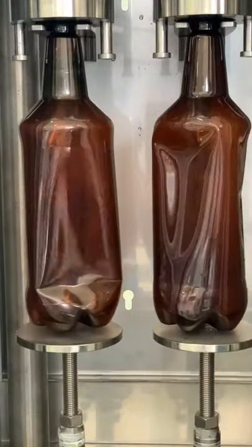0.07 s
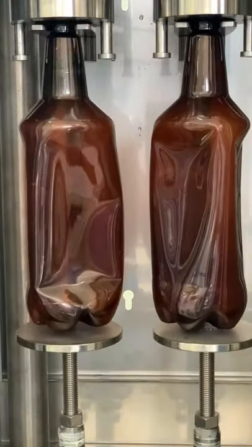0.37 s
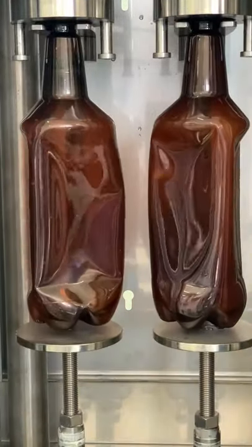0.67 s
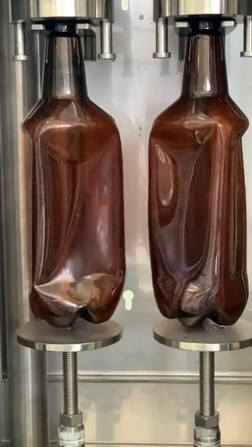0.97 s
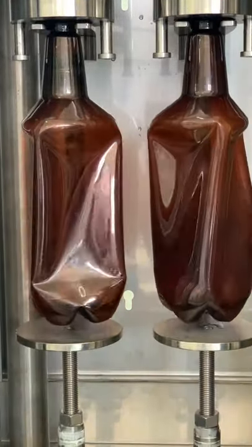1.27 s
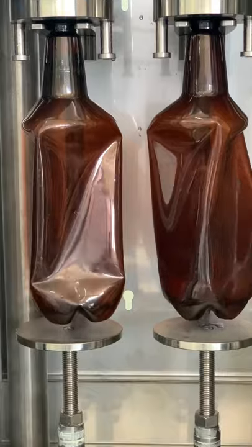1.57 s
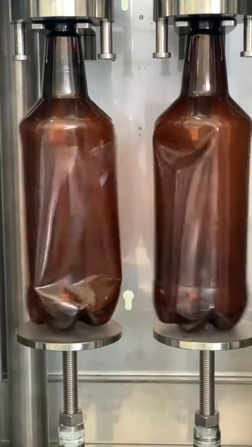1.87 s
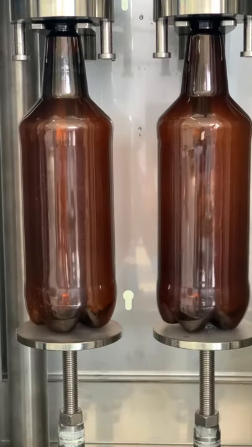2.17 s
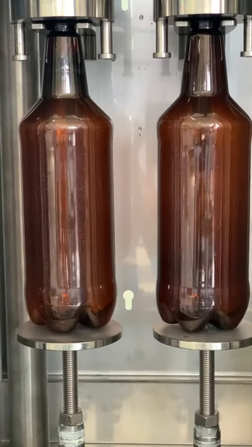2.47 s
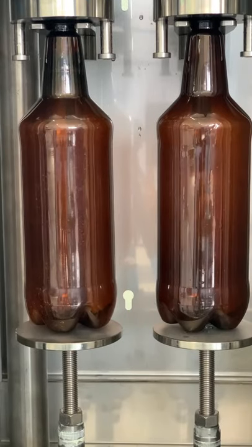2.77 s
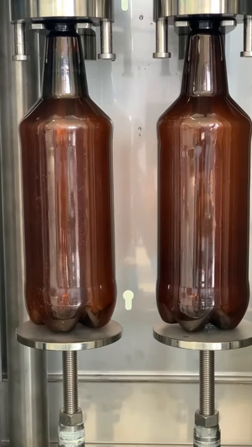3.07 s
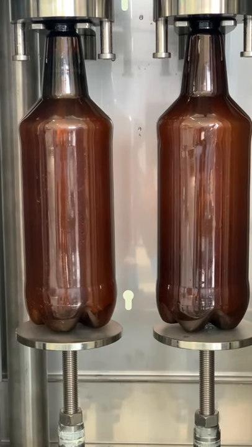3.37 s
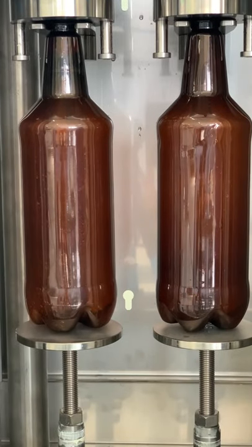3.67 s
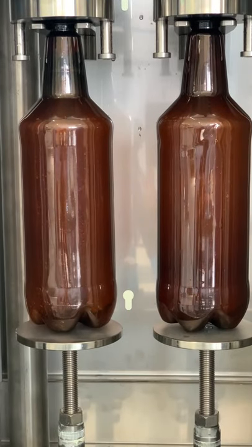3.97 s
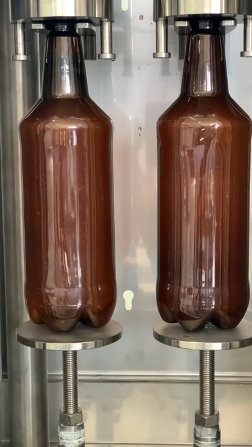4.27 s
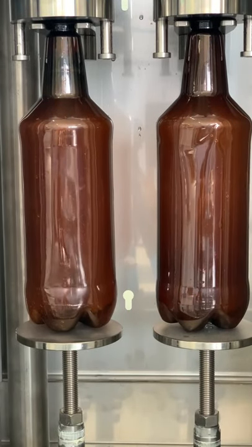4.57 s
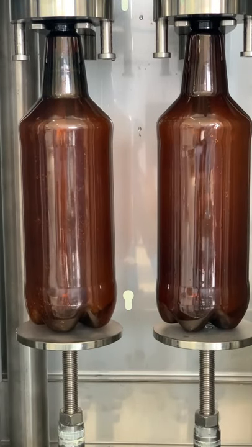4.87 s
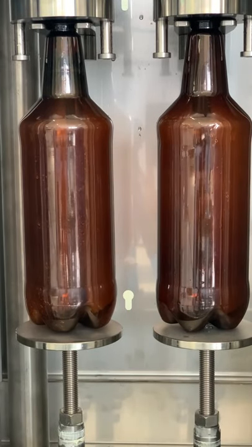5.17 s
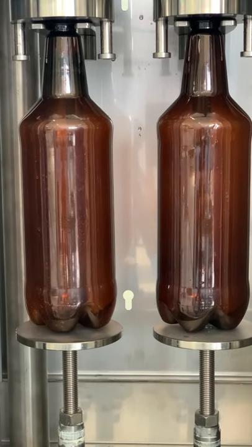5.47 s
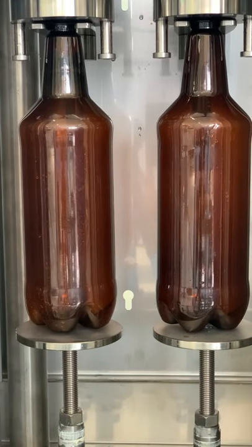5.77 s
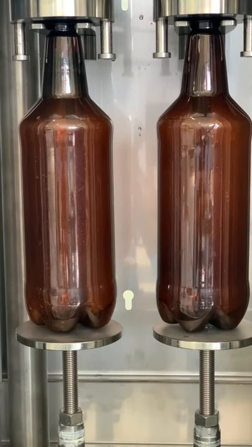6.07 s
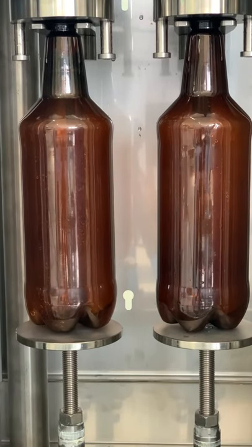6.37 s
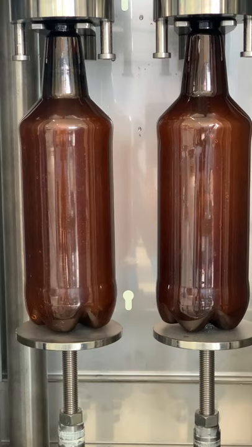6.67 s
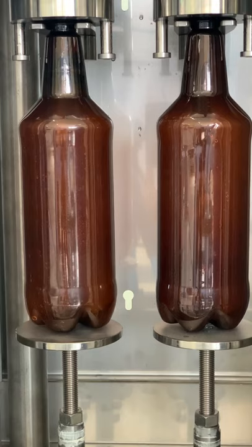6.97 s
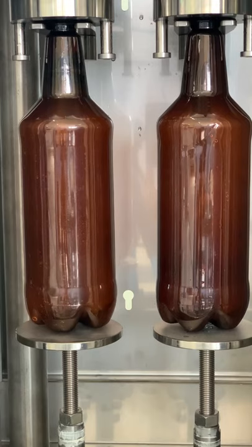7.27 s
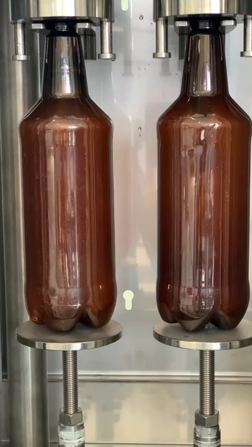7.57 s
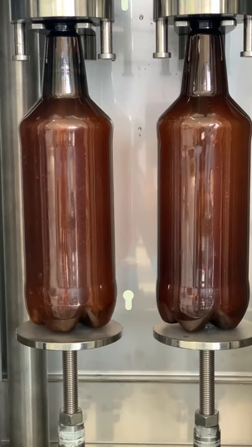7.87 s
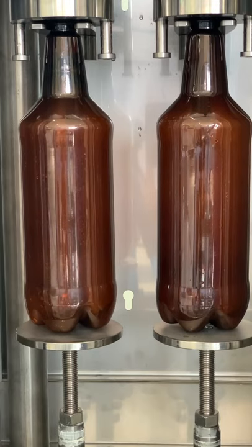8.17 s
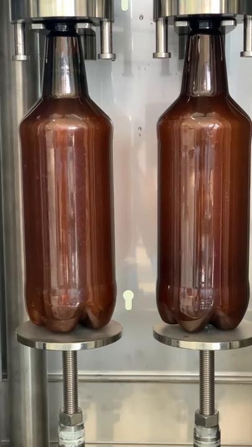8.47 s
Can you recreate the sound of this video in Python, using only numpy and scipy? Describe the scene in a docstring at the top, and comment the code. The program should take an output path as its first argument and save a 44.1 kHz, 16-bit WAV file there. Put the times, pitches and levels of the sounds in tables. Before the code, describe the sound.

A pump and motor hum quietly throughout, heard close inside a filling machine's steel cabinet. From the start, two plastic bottles buckle with scattered dull, hollow knocks over faint suction and leaking air. At about 1.7 seconds they snap back out in a loud, dense volley of pops and crackles, ending by 2 seconds. A hollow rush of gas follows. After a soft thump at 2.5 seconds, a thin, high, slightly whistling hiss sets in. Valves thump and click around 4.5 seconds and the hiss becomes fuller and louder. At 5.6 seconds more clicks and a tiny chirp narrow it again, while the hum swells with a faint whine. At about 7.7 seconds a valve bangs sharply and a loud, bright jet vents through a ringing pipe, fading from 8.1 seconds to the end.

```python
"""Two plastic bottles in a filler: vacuum buckles their walls, then gas snaps them back out in a volley
of pops. Pneumatic valves thump and switch between a throttled and a wide open hissing jet; at the end
a vent bangs open and blows through the ringing gas pipe. A pump and a motor hum behind it all.
Two closely spaced microphones listen in the steel cabinet."""
import sys
import numpy as np
from scipy import signal
from scipy.fft import rfft, irfft, next_fast_len
from scipy.io import wavfile
from scipy.ndimage import map_coordinates

SR = 44100
rng = np.random.default_rng(int(sys.argv[2]) if len(sys.argv) > 2 else 0)


def dump_mix(stems):
    """Bounce the given channels to the path in sys.argv[1] as a 16-bit WAV at rate SR."""
    frames = np.atleast_2d(stems).T  # one column per channel
    limited = np.clip(frames, -1, 1)  # hard clip at full scale
    pcm = np.round(limited * 32767).astype(np.int16)
    wavfile.write(sys.argv[1], SR, pcm)


N = 375732

# Bottle wall and valve block resonances. Each row: centre in Hz, width in Hz, gain in dB.
WALL_MODES = [(181.7, 16, 12), (306.5, 18, 6.5), (377, 16, 10), (460, 13, 5), (640, 23, 9.5), (735, 12, 10),
              (969, 12, 6), (1137, 18, 9), (1184, 14, 8), (1422, 7.1, -2.5), (1533, 16, 3), (1686, 17, 1.5),
              (2220, 20, 3), (2270, 20, 4), (2630, 14, 6)]
VALVE_MODES = [(546, 60, -23), (640, 200, 12), (1080, 61, 9.5), (1800, 410, 6), (2850, 81, 5)]
# Crumpling plastic. Each row: frequency in Hz, gain in dB.
CRUMPLE_SPECTRUM = [(30, -38), (70, 13), (130, -30), (600, -4.5), (1250, 3), (2400, -3), (3600, -6),
                    (7000, -19), (15000, -44)]
# Valve piston strokes. Each row: start in seconds, travel in seconds, level in dB.
PISTON_STROKES = [(2.499, 0.055, -27.5), (4.556, 0.022, -27), (5.599, 0.0497, -29), (7.657, 0.035, -24)]


def bottles():
    """Slack walls cave in with dull booms; taut ones snap back out with sharp cracks and ring."""
    # Each row: start in seconds, pitch in Hz, relative level in dB, ring in cycles, pitch slide.
    buckles = [(0, 248, -26, 7.8, 0.024), (.078, 827, -20.5, 8.4, -0.028), (0.082, 311.2, -19, 62, -.1),
               (.088, 1140, -30, 20, 0.21), (.135, 319, -20.5, 27, -0.039), (0.826, 304, -26.5, 11, 0.19),
               (0.842, 610, -19.5, 27, 0.11), (.973, 160, -34.5, 13, 0.14), (1.002, 143, -33, 8.8, 0.12),
               (1.092, 884, -34.5, 12, 0.21), (1.136, 1250, -50, 11, 0.065), (1.305, 804, -29.5, 7.6, 0.19),
               (1.44, 135, -15.5, 5.7, 0.44), (1.467, 96.5, -23, 5.9, 0.3), (1.499, 1006, -34, 20, 0.055),
               (1.608, 193.6, -15.5, 17, 0.29), (1.611, 640, -26, 23, -0.041), (1.649, 160, -26, 17, 0.15),
               (1.683, 496, -29, 20, 0.125)]
    # Each row: start in seconds, pitch in Hz, relative level in dB, crack offset in dB.
    snaps = [(1.722, 441, -14.5, -20), (1.731, 459, -11.5, -13), (1.746, 188, -12.5, -18),
             (1.749, 1170, -13, -15), (1.757, 279, -7.5, -11.5), (1.764, 586, -11.5, -17),
             (1.772, 1160, -28, -19), (1.79, 440, -16, -8), (1.797, 374, -8.5, -7), (1.843, 497, -17, -22),
             (1.849, 445, -12.5, 3.5), (1.88, 231, -17, -11), (1.896, 567, -14, 3), (1.95, 473, -17.5, -24),
             (1.977, 626, -13, -1.5), (1.983, 620, -12, -12)]
    crumple_db = lambda hz: 4.5 * np.log2(hz / 375)  # smaller, higher panels crumple more
    caving = [(s, hz, db, db + crumple_db(hz), db + crumple_db(hz)) for s, hz, db, _, _ in buckles]
    cycles, slides = np.transpose(buckles)[3:]
    dents = blows(caving, WALL_MODES, body_db=5, clack_db=-10, crack_db=-19, rise_s=0.0012,
                  cycles=cycles, slides=slides, clack_t60_s=0.19, crack_t60_s=0.042, dull_hz=3100,
                  fold_cycles=1)
    snapping = [(s, hz, db, db, db + sharp_db) for s, hz, db, sharp_db in snaps]
    pops = blows(snapping, WALL_MODES, body_db=-4.5, clack_db=1.5, crack_db=8, rise_s=0.0015,
                 cycles=42, slides=0.098, clack_t60_s=0.078, crack_t60_s=0.035, dull_hz=12200)
    return dents + pops + wall_ring(snaps, ring_db=-25, rise_s=0.002)


def blows(events, resonances, body_db, clack_db, crack_db, rise_s, cycles, slides,
          clack_t60_s, crack_t60_s, dull_hz, fold_cycles=0):
    """Each blow swings a panel, shakes its dense higher modes and cracks."""
    # Each row: frequency in Hz, gain in dB.
    crack_spectrum = [(1000, -45), (2800, 11.5), (5000, 7), (7200, 12), (9500, 7.5), (12500, -1),
                      (15500, 3)]
    near = [(200, 0.89), (1500, 0.98), (3500, 0.29), (7000, 1.0)]  # Hz, left-right coherence
    partials = [(0.65, -11.5), (1, -1), (1.37, -11.5), (1.85, -17)]  # pitch ratio, dB
    out, t = np.zeros((2, N)), np.arange(SR // 4) / SR
    dense = lambda f: np.hypot(colour(CRUMPLE_SPECTRUM)(f), modes(resonances)(f))
    dulled = lambda f: dense(f) / np.hypot(1, (f / dull_hz) ** 2)
    each = np.ones(len(events))
    for (s, hz, body, clack, crack), ring_cycles, slide in zip(events, cycles * each, slides * each):
        warped_s = t + slide * 0.025 * (1 - np.exp(-t / 0.031))  # pitch settles as the stress lets go
        panel = sum(amp(db) * np.sin(2 * np.pi * hz * ratio * warped_s * rng.normal(1, 0.0072))
                    for ratio, db in partials)
        panel_t60_s = ring_cycles / hz + 0.056
        sound = amp(body + body_db - 60 * t / panel_t60_s) * panel
        # Modes far below the panel's pitch hardly shake.
        shaken = lambda f: dulled(f) * f ** 2 / np.hypot(f ** 2, (0.24 * hz) ** 2)
        sound = sound + amp(clack + clack_db - 60 * t / clack_t60_s) * rush(shaken, near, len(t))
        sound += amp(crack + crack_db - 60 * t / crack_t60_s) * rush(colour(crack_spectrum), near, len(t))
        swell = 1 - np.exp(-(t / (rise_s + fold_cycles / hz)) ** 2)  # large panels fold more slowly
        add(out, s, swell * sound)
    return signal.sosfilt(signal.butter(3, 90, "high", fs=SR, output="sos"), out)


def wall_ring(snaps, ring_db, rise_s):
    """Every snap leaves the hollow walls ringing, each mode a little differently."""
    out, t = np.zeros((2, N)), np.arange(SR // 2) / SR
    for s, _, db, _ in snaps:
        ring = np.zeros(len(t))
        for hz, width_hz, mode_db in WALL_MODES:
            decay = amp(mode_db + 2 * rng.standard_normal()) * np.exp(-np.pi * width_hz * t)
            ring += decay * np.sin(2 * np.pi * hz * t + rng.uniform(0, 2 * np.pi))
        add(out, s, amp(db + ring_db) * (1 - np.exp(-t / rise_s)) * ring)
    return out


def crunch():
    """Small creases flatten in a dense, uneven rattle as the bottles fill out."""
    creases = unit(amp(5.9 * wobble(350)) * rush(colour(CRUMPLE_SPECTRUM)))
    return flow(1.722, 1.722, db=-22.6, rise_s=0.0098, fall_s=0.15) * creases


def vacuum():
    """Air is drawn through the resonant necks while the seals leak; gas surges in just before the pops."""
    # Each row: time in seconds, relative neck level in dB, relative rumble level in dB.
    suction = [(0.0, -41.5, -36), (0.358, -36.5, -42), (0.602, -38, -50.5), (0.886, -38, -40),
               (1.092, -38.5, -50.5), (1.402, -41, -51.5), (1.618, -46, -39), (1.72, -25, -32)]
    # Each row: centre in Hz, width in Hz, gain in dB.
    neck_modes = [(990, 38, 7.5), (1168, 117, 5), (1510, 160, 7), (1741, 22, 9.5), (2430, 40, 0),
                  (2744, 52, 0.5)]
    # Each row: start in seconds, end in seconds, level in dB.
    seal_leaks = [(0, 0.778, -36), (1.413, 1.47, -38), (1.568, 1.73, -38.5)]
    # Each row: frequency in Hz, gain in dB.
    leak_spectrum = [(500, -45), (2000, 0), (3300, -2), (5200, -2), (6200, -3), (8500, -1.5), (10500, -2),
                     (13000, 1), (14500, -2), (15600, -5)]
    neck_tilt = colour([(600, 9), (900, 5), (2850, 6), (3200, -12)])
    low = colour([(25, 9), (60, 5), (120, 9), (200, 8), (420, 5), (800, 2), (2000, -44), (5000, -53)])
    flutter = amp(1.1 * wobble(40))
    surge = flow(1.54, 1.91, db=-32, rise_s=0.014, fall_s=0.057)
    neck_gain = flutter * np.hypot(amp(1) * level(suction, column=1, fade_s=0.03), surge)
    necks = neck_gain * rush(lambda hz: modes(neck_modes)(hz) * neck_tilt(hz))
    rumble = amp(1.5) * level(suction, column=2, fade_s=0.0066) * rush(low)
    leaks = sum(flow(*row, rise_s=0.0043, fall_s=0.1, sag_db_per_s=4.5) for row in seal_leaks)
    seepage = flow(0, suction[-1][0], db=-50, rise_s=0.012, fall_s=0.05)
    return necks + rumble + np.hypot(leaks, seepage) * rush(colour(leak_spectrum))


def purge():
    """Gas floods the empty bottles; their hollow rush dies as the pressure evens out."""
    # Each row: frequency in Hz, gain in dB.
    hiss_spectrum = [(200, -48), (900, -38), (1500, -16), (2800, -9), (4200, -9), (6000, -11), (8500, -4.5),
                     (10500, -8), (11600, -9), (13200, -1.5), (14300, -3), (15600, -40)]
    hollow_spectrum = [(30, -3.5), (60, -10), (250, -10), (370, -3.5), (470, -6), (610, -6), (780, -6),
                       (1150, -10.5), (1600, -12.5), (2800, -16.5), (5000, -22.5), (9000, -38)]
    # Air in the bottles. Each row: centre in Hz, width in Hz, gain in dB.
    air_modes = [(372, 26, -6), (538, 25, -3.5), (628, 27, 2), (870, 40, -15), (1163, 75, -10.5),
                 (1490, 52, -14), (1780, 60, -13.5), (2450, 47, -26), (2800, 110, -26)]
    start_s, hiss_s, hollow_s = 2.014, 0.521, 0.22
    hiss = flow(start_s, start_s + hiss_s, db=-33.5, rise_s=0.12, fall_s=0.028)
    hiss = hiss * rush(colour(hiss_spectrum))
    air = amp(-2) * rush(colour(hollow_spectrum)) + amp(-3) * rush(modes(air_modes))
    hollow = flow(start_s, start_s + hollow_s, db=-27.5, rise_s=0.12, fall_s=0.4) * air
    return amp(1.1 * wobble(31.25)) * hiss + amp(0.76 * wobble(11)) * hollow


def knocks():
    """A valve hits its seat, rings the block and spits."""
    # Each row: start in seconds, pitch in Hz, relative levels of body, clack and spit in dB.
    seat_hits = [(4.539, 480, -34, -45, -52), (4.567, 724, -33, -39, -57), (4.599, 403, -25.5, -37, -59),
                 (4.638, 1230, -36, -37.5, -55), (4.679, 1910, -44, -38, -58), (5.584, 900, -42, -40, -46),
                 (5.612, 650, -43, -47, -55), (5.642, 2030, -24, -39, -49), (5.75, 674, -26, -35, -60),
                 (7.713, 680, -12.5, -29.5, -39), (7.739, 650, -13, -21, -14.5),
                 (7.744, 503, -19, -14, -31), (7.759, 1160, -14, -28, -45)]
    return blows(seat_hits, VALVE_MODES, body_db=-5.5, clack_db=-1, crack_db=5.5, rise_s=0.0008,
                 cycles=2.8, slides=0, clack_t60_s=0.08, crack_t60_s=0.071, dull_hz=6000)


def pistons():
    """A piston gives one low swing of air pressure as it starts and another as it stops."""
    swing_hz, width_s, centre_s = 92, 0.0098, 0.05
    out, t = np.zeros((2, N)), np.arange(SR // 10) / SR - centre_s
    swing = -np.cos(2 * np.pi * swing_hz * t) * np.exp(-(t / width_s) ** 2)
    for start_s, travel_s, db in PISTON_STROKES:
        for s in (start_s, start_s + travel_s):
            add(out, s - centre_s, amp(db) * swing)
    return out


def spills():
    """A moving piston lets a rough puff of air through."""
    # Each row: frequency in Hz, gain in dB.
    puff_spectrum = [(30, -34), (70, 12.5), (185, 1.5), (250, -5), (350, 1.5), (650, -22), (1300, -8),
                     (2200, -10.5), (4000, -13), (8000, -13), (15000, -60)]
    lead_s, lag_s = 0.023, 0.0029
    gain = sum(flow(s - lead_s, s + travel_s + lag_s, db - 9.5, rise_s=0.0025, fall_s=0.067)
               for s, travel_s, db in PISTON_STROKES)
    return gain * amp(0.66 * wobble(160)) * rush(colour(puff_spectrum))


def jets():
    """The valves switch between a throttled and a wide open jet; the flow sounds the pipe."""
    # Each row: start and end in seconds, level in dB, sag in dB/s, relative upper resonance level in dB.
    throttled_spans = [(2.602, 4.512, -37.5, 4, -41), (5.686, 7.622, -37, 0.5, -32)]
    # Each row: start in seconds, end in seconds, level in dB.
    open_spans = [(4.498, 4.59, -38), (4.634, 5.643, -33), (7.6, 7.716, -33.5)]
    # Each row: frequency in Hz, gain in dB.
    throttled_spectrum = [(2500, -45), (4400, -26), (6000, -20), (7100, -11), (7520, -5), (7720, 6.5),
                          (7900, 4), (8120, -1), (8480, 6.5), (8850, -3), (9150, -1), (9700, -12),
                          (10500, -1.5), (11500, -9), (12900, -12), (14100, -3.5), (15300, -24)]
    open_spectrum = [(2500, -45), (4400, -32), (5400, -16), (6600, -6), (8200, 1.5), (8700, -2), (9150, 1),
                     (9600, -2), (10250, 1.5), (11400, -6), (13000, -1), (14200, 0), (15000, -10),
                     (15600, -21)]
    pipe_tilt = colour([(1500, 8), (2400, 2), (2800, 3), (3300, 2), (3750, -3.5), (4300, -7.5),
                        (4900, -9.5), (7000, -11)])
    throttled = sum(flow(start_s, end_s, db, rise_s=0.013, fall_s=0.008, sag_db_per_s=sag)
                    for start_s, end_s, db, sag, _ in throttled_spans)
    upper = sum(flow(start_s, end_s, db, rise_s=0.08, fall_s=0.012, sag_db_per_s=8.5)
                for start_s, end_s, _, _, db in throttled_spans)
    wide = sum(flow(*row, rise_s=0.018, fall_s=0.0099, sag_db_per_s=4.5) for row in open_spans)
    out = wide * rush(colour(open_spectrum)) + throttled * rush(colour(throttled_spectrum))
    out += upper * amp(1.2 * wobble(30) - 1.5) * glide(rush(modes([(10700, 340, 0)])), waver=0.004)
    sustained = sum(flow(*row, rise_s=0.019, fall_s=0.019) for row in open_spans)
    drive = amp(-19) * throttled + amp(-17.5) * upper + amp(-18) * sustained
    out += drive * pipe(pipe_tilt, waver=0.00198, flutter_db=2)
    out += head_whistle()
    # One line never quite closes.
    seep = amp(-51.5) * rush(modes([(8180, 520, -0.24), (10900, 390, -0.75)]))
    seep += amp(-56.5) * rush(colour(open_spectrum))
    return seep + out * amp(0.2 * wobble(18))


def vent():
    """Pressure escapes in a bright jet that rings pipe and nozzle; its first gust roars in the block."""
    # Each row: frequency in Hz, gain in dB.
    jet_spectrum = [(60, -16), (200, -19), (1100, -13), (2100, -21), (3500, -27), (4400, -23), (5100, -15),
                    (5800, -19), (6900, -13), (7180, -28), (7450, -9), (7800, -1), (8050, -2), (8600, -11),
                    (9300, -6), (9650, -8), (10100, 0), (12700, 1), (14300, -1), (15600, -8)]
    # Each row: centre in Hz, width in Hz, gain in dB.
    nozzle_modes = [(7880, 130, -8), (10380, 110, -6), (10960, 80, -4), (11480, 75, 0), (11940, 55, -6),
                    (12590, 100, 1), (13340, 50, -7), (13780, 65, -2), (14330, 90, -3), (15460, 70, -5)]
    start_s, hold_s, gust_s = 7.719, 0.39, 0.019
    ringing = amp(-8.5) * pipe(np.ones_like, waver=0.00206, flutter_db=2.5)
    shrill = amp(-1) * rush(modes(nozzle_modes))
    blast = amp(-2) * rush(colour(jet_spectrum)) + ringing + glide(shrill, waver=0.00095)
    jet = flow(start_s, start_s + hold_s, db=-24, rise_s=0.0023, fall_s=0.62, sag_db_per_s=-1.5)
    gust = flow(start_s, start_s + gust_s, db=-32, rise_s=0.0046, fall_s=0.12)
    return jet * blast + gust * rush(modes(VALVE_MODES))


def pipe(tilt, waver, flutter_db):
    """Turbulent gas sounds the pipe; neighbouring resonances waver and flutter independently."""
    # Each row: centre in Hz, width in Hz, gain in dB.
    pipe_modes = [(1493, 20, -9.5), (1775, 27, -6), (2394, 44, -7), (2784, 42.5, 0.5), (3275, 33, -1.5),
                  (3734, 37, 0.5), (4174, 42, -1.5), (4680, 34, 0.5), (5000, 89, -20), (5514, 32, 2.5),
                  (5990, 37, 2), (6460, 61, 5.5), (6760, 140, 3.5)]
    out = np.zeros((2, N))
    for group in (pipe_modes[::2], pipe_modes[1::2]):
        response = lambda hz: modes(group)(hz) * tilt(hz)
        weight = np.linalg.norm(response(np.arange(SR // 2)))
        out += weight * glide(rush(response), waver) * amp(flutter_db * wobble(28))
    return unit(out)


def glide(x, waver):
    """Resonances follow the pipe's pitch: up in open flow, down when throttled, wavering by a share."""
    # Each row: time in seconds, main pipe resonance in Hz.
    pipe_pitch = [(2.6, 2850), (3.0, 2820), (3.5, 2750), (4.5, 2695), (5.1, 2810), (5.55, 2835),
                  (5.9, 2820), (6.5, 2755), (7.7, 2715), (7.95, 2775), (8.5, 2805)]
    nominal_hz = 2787
    speed = np.interp(np.arange(N) / SR, *np.transpose(pipe_pitch)) / nominal_hz
    position = np.cumsum(speed + waver * wobble(40))
    return np.array([map_coordinates(side, [position], order=5, mode="mirror") for side in x])


def chirps():
    """Gas squeezing past a valve seat whistles for a moment."""
    # Each row: start in seconds, length in seconds, pitch in Hz, level in dB.
    whistles = [(3.22, 0.15, 3020, -59), (3.472, 0.08, 2980, -57), (5.575, 0.039, 4430, -44),
                (5.617, 0.017, 2800, -47), (7.925, 0.07, 4670, -35)]
    return sum(flow(s, s + length_s, db, rise_s=0.0049, fall_s=0.012) * rush(modes([(hz, 22, 0)]))
               for s, length_s, hz, db in whistles)


def head_whistle():
    """A faint, narrow whistle at the filling heads."""
    return flow(3.08, 3.47, db=-57, rise_s=0.099, fall_s=0.77) * rush(modes([(1876, 5.6, 0)]))


def factory():
    """Hall noise, a humming motor and a pump that puffs once a turn; under load they swell and whine."""
    # Each row: multiple of the shaft rate, relative level in dB.
    pump_orders = [(6, -68), (8, -49.8), (9, -52.3), (11, -65), (12, -63.5), (14, -66.5), (15, -56),
                   (18, -66.5), (20, -68), (24, -74), (27, -74), (39, -69.5)]
    # Each row: frequency in Hz, gain in dB.
    throb_spectrum = [(200, -27), (380, 1), (750, -11), (1100, -7.5), (2000, -13), (5000, -50)]
    hall_spectrum = [(25, -28), (58, 4.5), (85, 0.5), (200, -2.5), (330, -1), (400, 2.5), (520, 0),
                     (750, -3.5), (1100, -4), (1500, -12.5), (1850, -7), (2150, -15.5), (3000, -14),
                     (8000, -45)]
    shaft_hz, whine_hz, whine_drop_hz = 47.78, 728, 50
    load_start_s, load_rise_s = 5.07, 1.5
    load = 1 - np.exp(-np.maximum(np.arange(N) / SR - load_start_s, 0) / load_rise_s)
    shaft_rad = 2 * np.pi * np.cumsum(shaft_hz + 0.0658 * wobble(11)) / SR
    pump = np.zeros(N)
    for order, db in pump_orders:
        peak = np.sqrt(2) * amp(db + 0.33 * wobble(7.9))
        pump += peak * np.sin(order * shaft_rad + rng.uniform(0, 2 * np.pi))
    motor = amp(-59.5) * tone(59.2, drift_hz=0.4, flutter_db=0.6)
    whine = tone(whine_hz + whine_drop_hz * (1 - load), drift_hz=7.9, flutter_db=3.5)
    whine = whine + amp(-3) * rush(modes([(whine_hz, 25, 0)]))
    throb = amp(-58.5) * unit((1 + np.cos(shaft_rad)) ** 3 * rush(colour(throb_spectrum)))
    hall = amp(-49.5) * rush(colour(hall_spectrum))
    return hall + amp(6.5 * load - 3.1) * (pump + throb + motor) + load * amp(-52.5) * whine


def cabinet(x):
    """The steel walls reverberate; the bass lasts longest."""
    # Each row: frequency in Hz, T60 in seconds.
    decay_times = [(100, 0.86), (500, 0.33), (2500, 0.14), (7000, 0.2), (15000, 0.21)]
    hz, t, noise = signal.stft(rng.standard_normal((2, SR // 2)), SR, nperseg=256)
    decay = amp(-60 * t / along(decay_times, hz)[:, None])
    mid, side = signal.istft(noise * decay, SR, nperseg=256)[1]
    side = filtered(side, colour([(100, -31), (400, -7), (1000, -9), (4000, -2), (7000, -23)]))
    tail = np.pad([mid + side, mid - side], ((0, 0), (SR // 200, 0)))  # 5 ms predelay
    return signal.fftconvolve(x, tail / np.linalg.norm(tail[0]), axes=1)[:, :N]


def flow(start_s, end_s, db, rise_s, fall_s, sag_db_per_s=0):
    """Gain per sample of a gas flow: it builds, sags with the pressure and dies away after its end."""
    t = np.arange(N) / SR
    age_s = np.maximum(t - start_s, 0)
    release = np.exp(-np.maximum(t - end_s, 0) / fall_s)
    return amp(db - sag_db_per_s * age_s) * (1 - np.exp(-age_s / rise_s)) * release


def rush(response, coherence=None, size=N):
    """Coloured stereo noise of rms 1."""
    # Each row: frequency in Hz, left-right coherence.
    default_coherence = [(100, .99), (350, .88), (700, .5), (1600, .6), (3000, .35), (4100, .35),
                         (4900, .95), (5800, .75), (6800, .95), (8400, .88), (9100, .99), (9700, .999),
                         (10200, .99), (11000, .87), (12400, .96), (14000, .92), (14700, .998)]
    angle = lambda hz: np.arccos(np.clip(along(coherence or default_coherence, hz), -1, 1)) / 2
    split = lambda hz: response(hz) * [np.cos(angle(hz)), np.sin(angle(hz))]
    mid, side = filtered(rng.standard_normal((2, size)), split)
    return unit(np.array([mid + side, mid - side]))


def tone(hz, drift_hz, flutter_db):
    """A slightly unsteady motor line of rms about 1."""
    phase = 2 * np.pi * np.cumsum(hz + drift_hz * wobble(6)) / SR
    return np.sqrt(2) * np.sin(phase) * amp(flutter_db * wobble(2.66))


def amp(db):
    return 10 ** (np.asarray(db) / 20)


def unit(x):
    return x / np.sqrt(np.mean(x ** 2) + 1e-20)


def along(points, hz):
    """Interpolate (Hz, value) points on a log axis."""
    point_hz, values = np.transpose(points)
    return np.interp(np.log(hz + 1), np.log(point_hz + 1), values)


def colour(points):
    """Frequency response of (Hz, dB) points."""
    return lambda hz: amp(along(points, hz))


def modes(table):
    """Frequency response of (centre Hz, width Hz, dB) resonances with steep skirts."""
    return lambda hz: np.sqrt(sum((amp(db) / (1 + ((hz - centre_hz) / width_hz) ** 2)) ** 2
                                  for centre_hz, width_hz, db in table))


def level(rows, column, fade_s):
    """Gain per sample of one dB column, fading out beyond its time span."""
    t, times_s = np.arange(N) / SR, np.transpose(rows)[0]
    gate = np.clip(1 + np.minimum(t - times_s[0], times_s[-1] - t) / fade_s, 0, 1)
    return gate * amp(np.interp(t, times_s, np.transpose(rows)[column]))


def wobble(rate_hz):
    """A smooth random curve with rate_hz knots a second."""
    knots = rng.standard_normal(int(N * rate_hz / SR) + 4)
    return map_coordinates(knots, [np.arange(N) * rate_hz / SR])


def filtered(x, response):
    """Apply a frequency response."""
    size = x.shape[-1]
    padded = next_fast_len(size + 8192)
    return irfft(rfft(x, padded) * response(np.fft.rfftfreq(padded, 1 / SR)), padded)[..., :size]


def add(track, start_s, sound):
    part = track[:, max(round(start_s * SR), 0):][:, :sound.shape[-1]]
    part += sound[..., :part.shape[1]]


def scene():
    """Blows and puffs echo in the cabinet over the gas flows and the factory."""
    hits = bottles() + crunch() + knocks() + spills()
    echo = amp(-12) * cabinet(hits)
    return hits + echo + pistons() + factory() + vacuum() + purge() + jets() + chirps() + vent()


def record(dry):
    """Sound reaches two microphones a little apart; peaks round off and the top treble is cut."""
    # Each row: frequency in Hz, left phase lead in radians.
    phase_lead = [(0, 0), (700, -.5), (1400, -.1), (2200, .7), (3500, 1.2), (4900, 3.14), (7000, 6.28),
                  (9700, 9.42), (12400, 12.57), (14800, 15.6), (15600, 15.85)]
    # Each row: frequency in Hz, left minus right in dB.
    balance = [(100, -0.4), (370, 1), (700, -3), (1200, -0.4), (2000, -2.2), (4000, -0.4), (7000, -0.2),
               (9500, 0)]
    # The deepest bass and highest treble fall away. Each row: frequency in Hz, gain in dB.
    band_limits = [(20, -9), (45, -0.5), (14200, -1.2), (15000, -11), (15600, -23)]
    sides, top_hz = np.array([[0.5], [-0.5]]), 15660
    phase = lambda hz: np.exp(1j * sides * np.interp(hz, *np.transpose(phase_lead)))
    gain = lambda hz: amp(sides * along(balance, hz)) * colour(band_limits)(hz)
    heard = filtered(dry, lambda hz: phase(hz) * gain(hz))
    rounded = heard / (1 + heard ** 4) ** (1 / 4)
    return filtered(rounded, lambda hz: hz < top_hz)


dry = scene()
out = record(dry)
dump_mix(out)
```